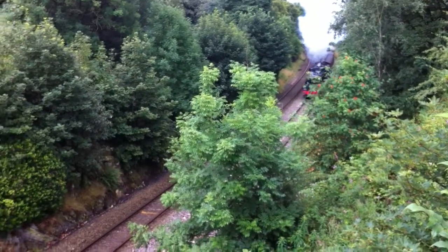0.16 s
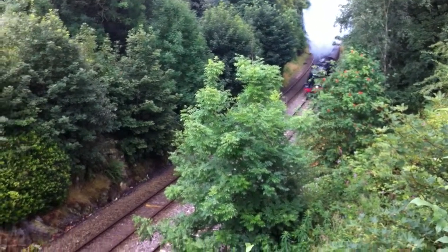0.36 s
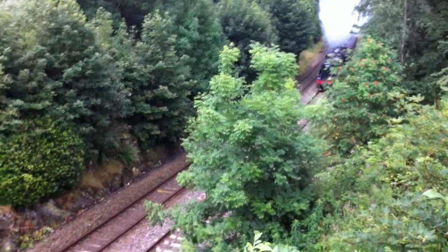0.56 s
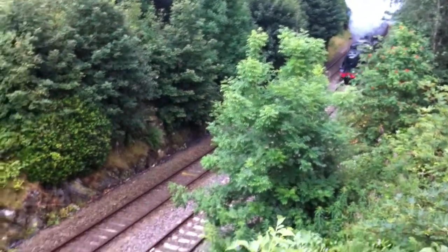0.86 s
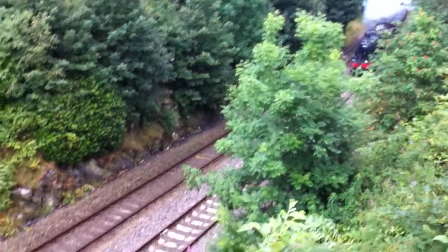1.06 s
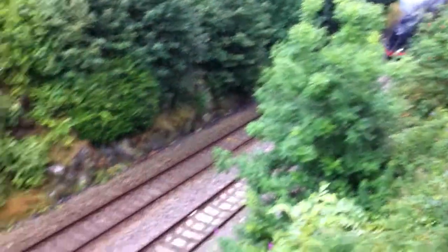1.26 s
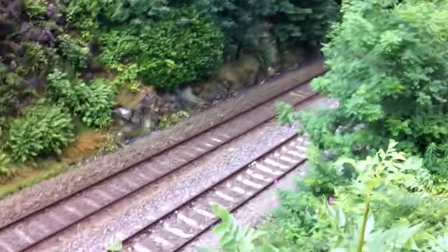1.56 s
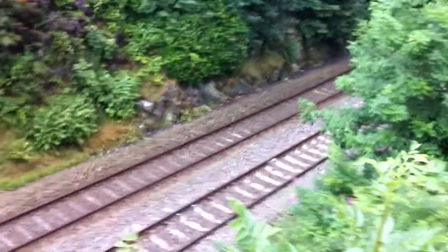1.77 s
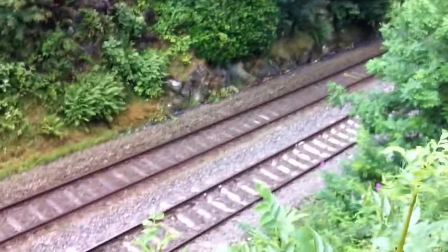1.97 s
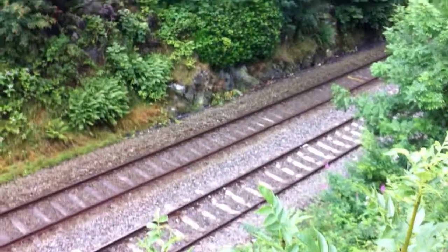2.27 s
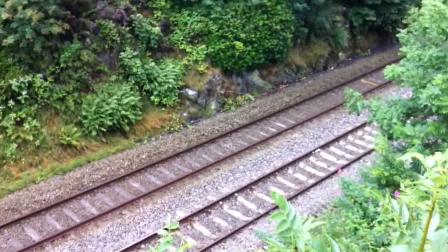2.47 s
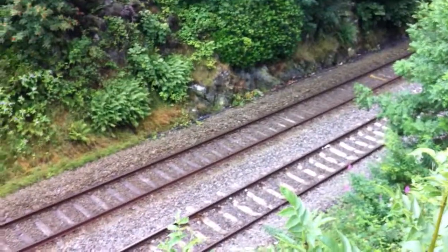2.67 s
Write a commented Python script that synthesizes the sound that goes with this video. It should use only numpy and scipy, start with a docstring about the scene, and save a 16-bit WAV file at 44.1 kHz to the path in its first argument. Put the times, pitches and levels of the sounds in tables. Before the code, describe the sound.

A steam locomotive chuffs fast and hard, its breathy exhaust beats growing louder as it approaches

```python
"""Steam locomotive working hard

A steam locomotive works toward a phone above a leafy cutting, its exhaust beats growing louder.
Each beat is two short gliding tones with breathy bass (chimney boom) and three bands of shaped noise (jet).
Flickering noise stands for echoes and the rolling train; faint wind and electronic hiss lie beneath.
The phone gradually turns away: the noise crossfades from one spectral colour to another."""
import sys
import numpy as np
from scipy import signal
from scipy.fft import rfft, irfft
from scipy.io import wavfile
from scipy.ndimage import uniform_filter1d, map_coordinates

SR = 44100
rng = np.random.default_rng(int(sys.argv[2]) if len(sys.argv) > 2 else 0)


def dump_mix(stems):
    """Bounce the given channels to the path in sys.argv[1] as a 16-bit WAV at rate SR."""
    frames = np.atleast_2d(stems).T  # one column per channel
    limited = np.clip(frames, -1, 1)  # hard clip at full scale
    pcm = np.round(limited * 32767).astype(np.int16)
    wavfile.write(sys.argv[1], SR, pcm)


N = 123921
T = np.arange(N) / SR


def undb(db):
    """Amplitude gain of a dB value."""
    return 10 ** (np.asarray(db) / 20)


def walk(rate_hz):
    """Smooth random wander, standard deviation 1, from rate_hz random steps per second."""
    step = max(int(SR / rate_hz), 2)
    held = np.repeat(rng.standard_normal(N // step + 1), step)
    smooth = uniform_filter1d(uniform_filter1d(held, step), step)[:N]
    return smooth / smooth.std()


# spectral colour, phone facing the engine / turned away: [f/Hz, relative density/dB]
FACING_COLOUR = [(15, -65), (25, -46), (123, -24), (148, -12), (210, -2), (268, -1.5), (299, -11),
                 (351, -9.5), (424, -18.5), (555, -14), (809, -18), (977, -15), (1550, -22), (1770, -17),
                 (2440, -15.5), (4800, -28.5), (6450, -26.5), (7380, -30), (9160, -30), (14100, -49),
                 (15700, -53)]
AWAY_COLOUR = [(15, -76), (25, -53), (59, -39), (91, -28), (144, -5), (228, 2), (247, -1), (299, -12.5),
               (324, -9.5), (413, -16.5), (460, -10.5), (670, -16.5), (926, -14.5), (1250, -17),
               (2250, -20.5), (3970, -34.5), (4800, -33.5), (5340, -42.5), (8000, -39), (11700, -50),
               (15700, -56)]
# narrow peaks and dips on each colour: [f/Hz, width/Hz, level/dB]
FACING_RESONANCES = [(963, 31, 4.5), (1560, 74, -3), (3700, 500, 1), (4600, 500, -3), (7400, 580, -11),
                     (13800, 2000, 2)]
AWAY_RESONANCES = [(955, 140, 3), (4780, 330, 5.5), (4330, 300, -6), (5800, 600, 6), (3100, 300, -2.5),
                   (3850, 200, -3), (7900, 250, 5), (7200, 600, -2), (10600, 800, 2.5), (11900, 1200, -4),
                   (545, 50, 1.5)]
BAND_EDGES_HZ = (0, 310, 1500, 4500, 22050)  # rumble, roar, hiss, sizzle
TURN_START_S, TURN_END_S = 0.72, 2.43


def coloured(x, band, peak_share=1):
    """Filter x to one band in both colours, each at rms 1, and crossfade them as the phone turns away."""
    f = np.maximum(np.fft.rfftfreq(N, 1 / SR), 1)
    lo, hi = BAND_EDGES_HZ[band], BAND_EDGES_HZ[band + 1]
    gate = np.sqrt(1 / (1 + (f / hi) ** 16) / (1 + (lo / f) ** 16))
    spectrum = rfft(x) * gate
    views = []
    for colour, peaks in ((FACING_COLOUR, FACING_RESONANCES), (AWAY_COLOUR, AWAY_RESONANCES)):
        curve = np.array(colour)
        db = np.interp(np.log(f), np.log(curve[:, 0]), curve[:, 1])
        for peak_hz, width_hz, peak_db in peaks:
            db = db + peak_share * peak_db / (1 + (2 * (f - peak_hz) / width_hz) ** 2)
        view = irfft(spectrum * undb(db), N)
        views.append(view / view.std())
    turn = np.clip((T - TURN_START_S) / (TURN_END_S - TURN_START_S), 0, 1)
    return (1 - turn) * views[0] + turn * views[1]


def puff(peak_s, rise_s, hold_s, fall_s, blunt):
    """Sample span, time from peak, and envelope: sine-power swell, hold, exponential decay."""
    span = slice(max(int((peak_s - .06) * SR), 0), min(int((peak_s + .16) * SR), N))
    t = T[span] - peak_s
    swell = np.sin(np.pi / 2 * np.clip(1 + (t + hold_s / 2) / rise_s, 0, 1)) ** blunt
    decay = np.exp(-np.maximum(t - hold_s / 2, 0) / fall_s)
    return span, t, swell * decay


CRACKLE_RATE_HZ, CRACKLE_SPREAD_DB = 3000, 2.2  # mean hits per second; mean of exponential boost


def steam(crackle_share):
    """Turbulent rush: white noise with a share of its power in sparse random impulses."""
    hits = (rng.random(N) < CRACKLE_RATE_HZ / SR) * rng.standard_normal(N)
    hits = hits * undb(CRACKLE_SPREAD_DB * rng.exponential(size=N))
    share = np.clip(crackle_share, 0, 1)
    return np.sqrt(1 - share) * rng.standard_normal(N) + np.sqrt(share) * hits / hits.std()


PATCH_DB, PATCH_HZ, PATCH_S = 1.0, 250, .02  # gain spread; grid spacing in f and t


def ragged(x):
    """Turbulence: random gains make small time-frequency patches flare and drop out."""
    _, _, z = signal.stft(x, nperseg=256)
    cell = np.array([PATCH_HZ * 256 / SR, PATCH_S * SR / 128])  # bins, frames
    grid = np.indices(z.shape) / np.maximum(cell, 1)[:, None, None]
    field = map_coordinates(rng.standard_normal(z.shape), grid, order=1)
    gain = undb(PATCH_DB * field / field.std())
    y = signal.istft(z * gain, nperseg=256)[1][:N]
    return y / y.std()


# exhaust beats: [peak t/s, lead-in/ms and tail/ms before scaling by JET_RISE and JET_FALL,
#  roar level/dB, hiss level/dB, sizzle level/dB,
#  ring lag/ms, ring f/Hz, ring level/dB, thump lag/ms, thump f/Hz, thump level/dB]
EXHAUST_BEATS = [(-0.004, 5.0, 11, -25.5, -29.5, -51, 14, 220, -29.5, 12, 162, -30),
                 (0.065, 16, 20.0, -29.5, -26.5, -35.5, 1, 231.0, -29, 20, 166.0, -32),
                 (0.13, 12, 29, -24.5, -25, -35, -3, 239, -20.5, -6.5, 176, -40),
                 (0.19, 6.7, 22, -30, -27, -37, 0.5, 224.4, -22.5, 3.5, 176, -46),
                 (0.264, 14, 22, -30, -27, -39, 3.5, 229, -20.5, 12.5, 167, -45),
                 (0.338, 11, 28, -25.5, -25.5, -36, 16.0, 234.0, -21, 27, 176, -45),
                 (0.41, 12.0, 27, -22.6, -24, -34.5, 3.5, 232.2, -18, 20.5, 166.4, -35),
                 (0.468, 8.4, 20, -42, -26.5, -35.5, 35.5, 240.6, -29.7, -7.5, 179, -38),
                 (0.54, 9.6, 18, -38, -27, -36, 31.5, 233.4, -28, 7, 173, -33.6),
                 (0.621, 13, 15, -30, -24.5, -33, 21.5, 214.5, -22.5, -1.5, 171, -25),
                 (0.694, 23, 25, -22.5, -26, -35, 8.0, 228.7, -19, -24.5, 162, -33.2),
                 (0.75, 13, 23, -31.5, -28, -36.5, -3.0, 219, -22.5, 3.0, 177, -22.5),
                 (0.821, 13.0, 20, -28, -28.5, -37, 19.5, 235.4, -32, 9.5, 176.0, -33.3),
                 (0.899, 17, 22, -26, -25.5, -36.5, -1.5, 223.0, -16.9, -2.5, 182, -28),
                 (0.967, 16, 23, -22.5, -24, -35, 16.5, 251.8, -21, -16, 165, -32.5),
                 (1.025, 12.0, 22, -24.5, -29.5, -38, 1.0, 235.8, -24.5, 25, 181, -30),
                 (1.099, 9.1, 16, -27.1, -31, -38, 4.5, 240, -25, 2.5, 159, -23),
                 (1.178, 15, 19, -25.5, -27.5, -37, 19, 232.6, -24.5, -11.5, 163, -28.5),
                 (1.242, 10, 33, -27.5, -27, -37, 0.5, 241, -17.5, 3, 173.3, -23),
                 (1.302, 10, 36, -27, -30, -41.5, 7.0, 250.6, -21, 22, 168.5, -28),
                 (1.371, 10, 16, -27, -30.5, -41.5, 7.5, 240.3, -19, -8.5, 175, -29),
                 (1.452, 8.6, 19, -22, -27.7, -38, -6.5, 257.6, -21.5, 23.5, 154, -29),
                 (1.526, 23, 19, -23, -29.5, -38.5, -12.5, 233.5, -19, 16, 175, -27),
                 (1.579, 11.0, 21, -25, -31.5, -39.5, -25.0, 252, -23, 14.0, 158.5, -26.5),
                 (1.646, 4.7, 25, -25, -33.5, -41, 16, 206.4, -22.5, 16.5, 172.6, -21.5),
                 (1.727, 6, 16, -21, -28, -36.5, -9.0, 231.3, -16.5, 6, 170.6, -21),
                 (1.801, 18.0, 29, -22.5, -27, -36.7, 13.5, 231.4, -25, -1.0, 173, -20.5),
                 (1.857, 7.2, 15, -23, -30.5, -37.5, -8, 219.5, -20.5, -4, 181, -24.5),
                 (1.929, 12.0, 14, -26, -33, -41, -6.5, 244, -26, 0.0, 158, -19),
                 (2.007, 12, 21, -21, -28.5, -37.4, -10.0, 217.4, -20.5, -12, 175.6, -22),
                 (2.077, 16.0, 25, -19, -27, -36.9, 9, 243.4, -16, 13, 155, -32),
                 (2.132, 4.6, 17.3, -20.5, -30, -39, -6.0, 240, -21.2, 8.0, 171, -22.5),
                 (2.206, 8.5, 16, -23.7, -27, -44, 1, 221.5, -19.2, -3, 170.7, -22),
                 (2.284, 11, 13, -18, -26, -39.5, 2.0, 227, -20, -8, 176.7, -19),
                 (2.357, 17.0, 20, -17.5, -25, -36, -3.0, 226.2, -11, 17.0, 173, -37),
                 (2.414, 17, 30, -18, -31, -38, -11, 235.5, -16, 9.5, 175, -30),
                 (2.481, 6.0, 21, -22, -29.5, -38.5, 8.5, 226.7, -20.5, 35, 177, -28),
                 (2.564, 10, 10, -19, -23, -33.5, -9.0, 221.7, -23, 9, 165, -32),
                 (2.626, 11, 44, -20.5, -22, -33, 16.5, 233.3, -22, 12, 168, -21.5),
                 (2.688, 10, 26, -19.5, -25, -35.5, 25, 236, -21.5, 21, 162, -24),
                 (2.757, 6, 13.0, -24, -26, -39, 13.0, 220.4, -23.5, -4, 158.4, -18)]
JET_RISE, JET_FALL = 1.5, (1.5, 0.9, 1.06)  # times lead-in; times tail (roar, hiss, sizzle)
JET_HOLD_S, JET_BLUNT = 0.005, 1.15  # blunt under 2 = abrupt start
CRACKLE_SHARE = (.04, .07, 0.04)  # roar, hiss, sizzle
FLUTTER_DB, FLUTTER_RATE_HZ = -0.5, 90


def jets():
    """Exhaust jets: noise bands swell and decay at each beat, with one flutter common to all bands."""
    out = np.zeros(N)
    flutter = undb(FLUTTER_DB * walk(FLUTTER_RATE_HZ))
    for k in range(3):
        power = np.zeros(N)
        for beat in EXHAUST_BEATS:
            rise_s = JET_RISE * beat[1] / 1000
            fall_s = JET_FALL[k] * beat[2] / 1000
            span, _, shape = puff(beat[0], rise_s, JET_HOLD_S, fall_s, JET_BLUNT)
            power[span] += (undb(beat[3 + k]) * shape) ** 2
        noise = coloured(ragged(steam(CRACKLE_SHARE[k])), k + 1)
        out += np.sqrt(power) * flutter * noise
    return out


# pairs: ring, thump
BOOM_RISE_S, BOOM_FALL_S = (0.017, 0.018), (0.016, 0.012)
BOOM_HOLD_S, BOOM_HOLD_S_PER_DB = 0.0051, .0006  # tones hold longer per dB above -25 dB
BOOM_GLIDE_HZ_PER_S = (380, 96)
BOOM_WAVER_HZ, BOOM_WAVER_RATE_HZ = 12, 40
BOOM_AIR_DB, BOOM_AIR_RISE_S, BOOM_AIR_FALL_S = -11.5, 0.02, 0.025  # dB re tone
BOOM_FLOOR_HZ = 122  # the small microphone drops what lies below


def booms():
    """Chimney boom: two wavering, upward-gliding tones per beat, plus breathy bass noise."""
    tone, air_power = np.zeros(N), np.zeros(N)
    start_cycles = rng.random((len(EXHAUST_BEATS), 2))
    for k in range(2):
        waver_hz = BOOM_WAVER_HZ * walk(BOOM_WAVER_RATE_HZ)
        for beat, start in zip(EXHAUST_BEATS, start_cycles):
            lag_ms, hz, db = beat[6 + 3 * k:9 + 3 * k]
            hold_s = BOOM_HOLD_S + BOOM_HOLD_S_PER_DB * max(db + 25, 0)
            tone_s = beat[0] + lag_ms / 1000
            span, t, shape = puff(tone_s, BOOM_RISE_S[k], hold_s, BOOM_FALL_S[k], 2.44)
            pitch_hz = hz + BOOM_GLIDE_HZ_PER_S[k] * np.clip(t, -.03, .03) + waver_hz[span]
            cycles = start[k] + np.cumsum(pitch_hz) / SR
            tone[span] += np.sqrt(2) * undb(db) * shape * np.sin(2 * np.pi * cycles)
            span, _, shape = puff(beat[0], BOOM_AIR_RISE_S, BOOM_HOLD_S, BOOM_AIR_FALL_S, 2)
            air_power[span] += (undb(db + BOOM_AIR_DB) * shape) ** 2
    boom = tone + np.sqrt(air_power) * coloured(rng.standard_normal(N), 0)
    floor = signal.butter(4, BOOM_FLOOR_HZ, "high", fs=SR, output="sos")
    return signal.sosfilt(floor, boom)


# wash between beats: [t/s, rumble level/dB, roar level/dB, hiss level/dB, sizzle level/dB]
WASH_LEVELS = [(0.0, -32, -31.5, -37, -45), (0.14, -30, -33, -37, -50), (0.28, -36, -31.5, -39, -50),
               (0.38, -33, -28.5, -38.5, -48.5), (0.63, -32.5, -30.5, -36, -48.5),
               (1.09, -31, -31, -35.5, -46.5), (1.51, -31.5, -30.5, -34.5, -44),
               (1.88, -29, -27.5, -33.5, -43.5), (2.32, -26.5, -27.5, -31.5, -41),
               (2.56, -24, -27, -30, -40), (2.81, -23.5, -23, -29, -38.5)]
WASH_FLICKER_DB, WASH_FLICKER_RATE_HZ = (1.2, .6, .5, .5), 12.45  # rumble, roar, hiss, sizzle
WASH_PEAK_SHARE = .45  # shallower narrow peaks


def wash():
    """Bank echoes and rolling train as continuous noise, each band flickering alone."""
    rows = np.array(WASH_LEVELS)
    out = np.zeros(N)
    for k in range(4):
        level_db = np.interp(T, rows[:, 0], rows[:, 1 + k])
        flicker_db = WASH_FLICKER_DB[k] * walk(WASH_FLICKER_RATE_HZ)
        out += undb(level_db + flicker_db) * coloured(rng.standard_normal(N), k, WASH_PEAK_SHARE)
    return out


WIND_DB, WIND_HZ = -66, 60
WIND_GUST_DB, WIND_GUST_RATE_HZ = 4.5, 5


def wind():
    """Wind on the microphone: faint low-passed noise with wandering level."""
    lowpass = signal.butter(2, WIND_HZ, fs=SR, output="sos")
    low = signal.sosfilt(lowpass, rng.standard_normal(N))
    return undb(WIND_DB + WIND_GUST_DB * walk(WIND_GUST_RATE_HZ)) * low / low.std()


MIC_HISS_DB, MIC_HISS_HZ = -61.5, 12500  # level before the phone's top cut


def mic_hiss():
    """Phone electronics: faint steady high-passed noise."""
    highpass = signal.butter(4, MIC_HISS_HZ, "high", fs=SR, output="sos")
    top = signal.sosfilt(highpass, rng.standard_normal(N))
    return undb(MIC_HISS_DB) * top / top.std()


def scene():
    """Sum of all layers, one channel."""
    return (jets() + booms() + wash() + wind() + mic_hiss())[None]


TOP_HZ = 15800


def record(dry):
    """The phone cuts the top: steep elliptic low-pass."""
    return signal.sosfilt(signal.ellip(12, .2, 90, TOP_HZ, fs=SR, output="sos"), dry)


dry = scene()
out = record(dry)
dump_mix(out)
```